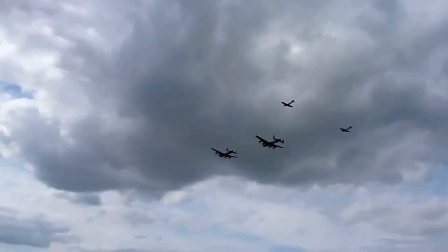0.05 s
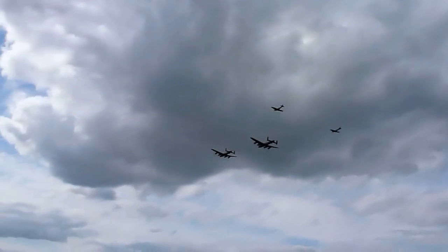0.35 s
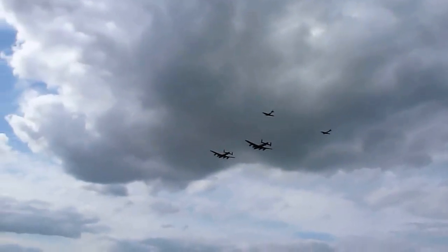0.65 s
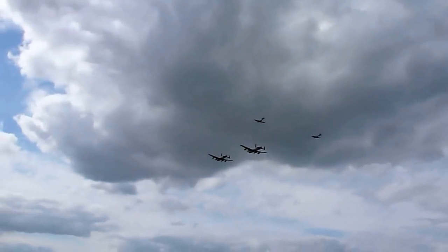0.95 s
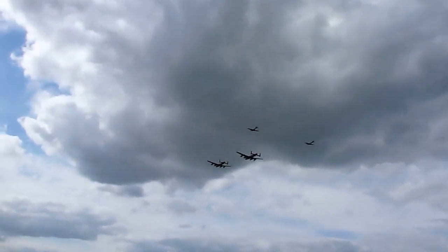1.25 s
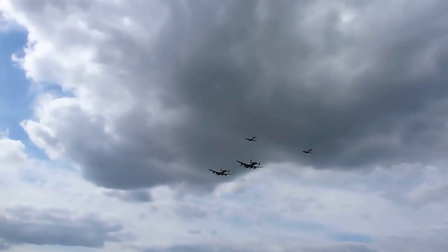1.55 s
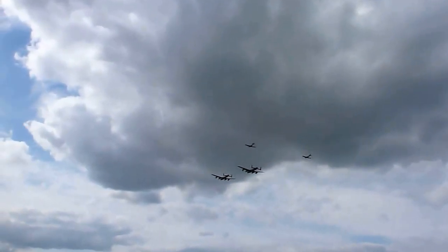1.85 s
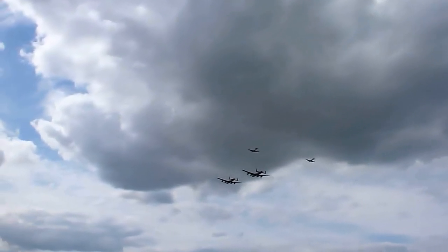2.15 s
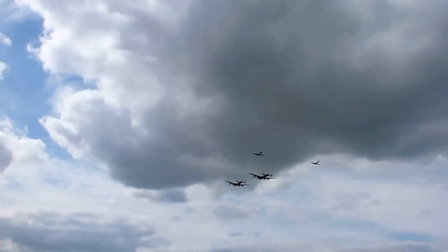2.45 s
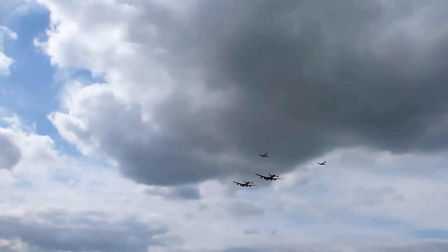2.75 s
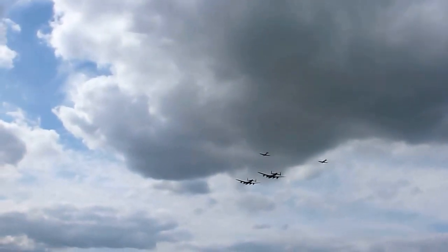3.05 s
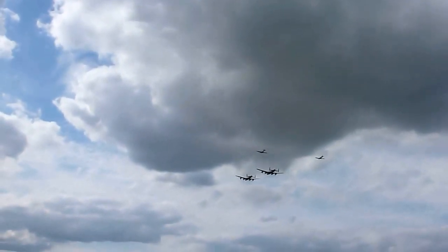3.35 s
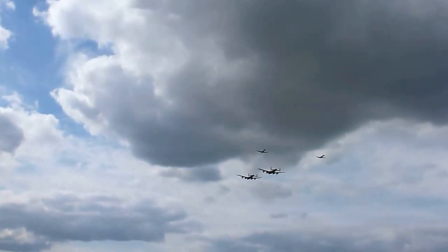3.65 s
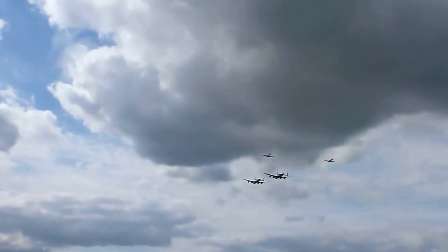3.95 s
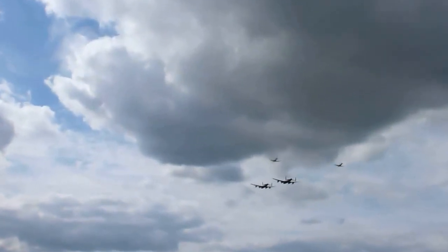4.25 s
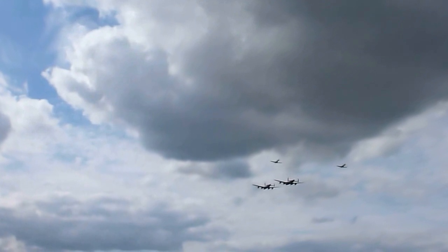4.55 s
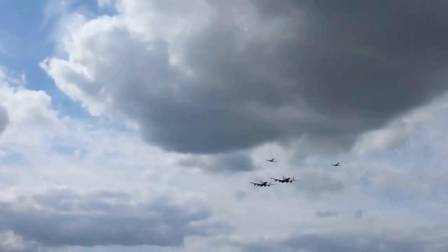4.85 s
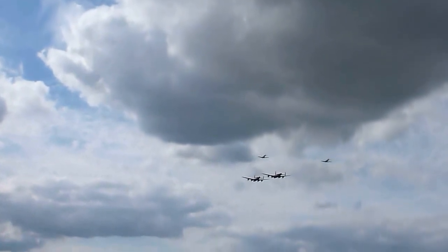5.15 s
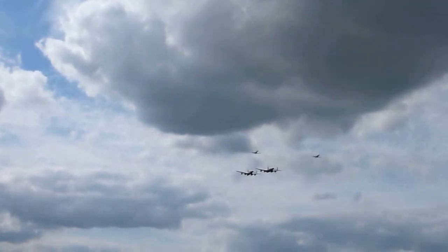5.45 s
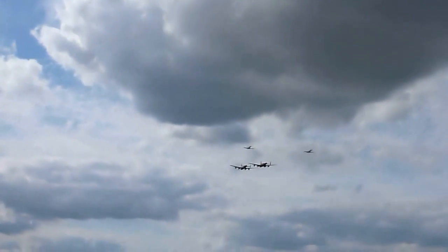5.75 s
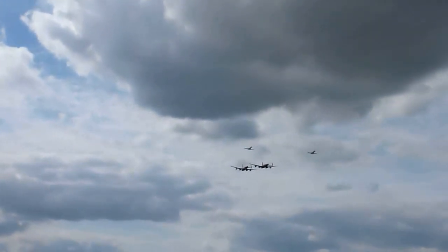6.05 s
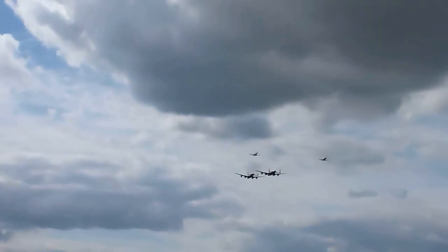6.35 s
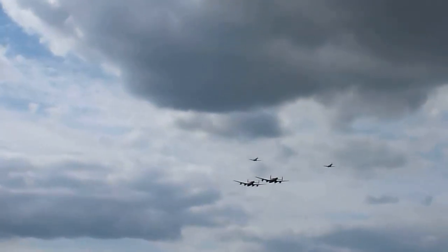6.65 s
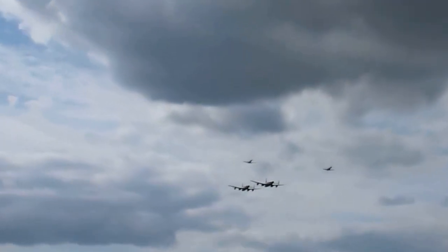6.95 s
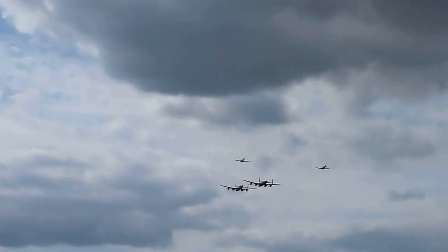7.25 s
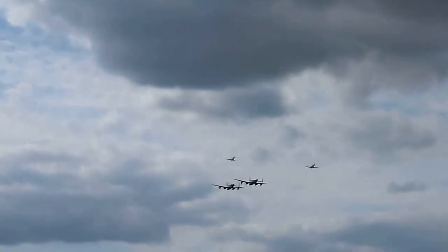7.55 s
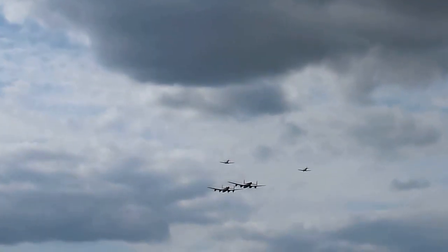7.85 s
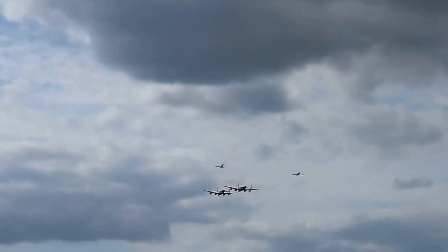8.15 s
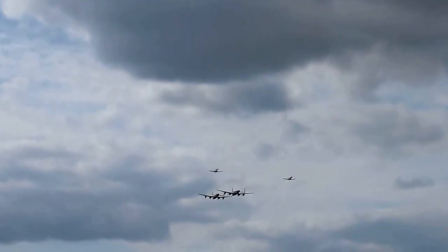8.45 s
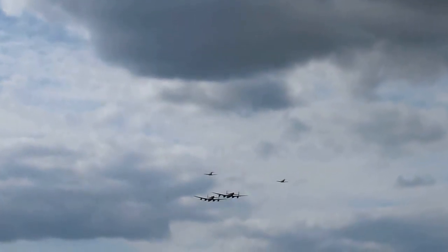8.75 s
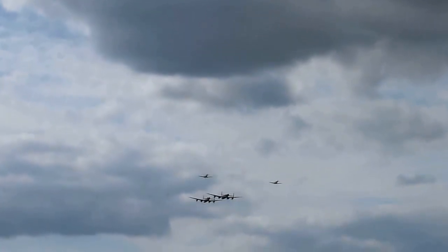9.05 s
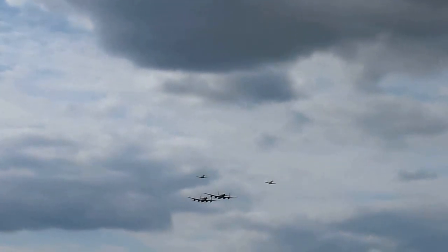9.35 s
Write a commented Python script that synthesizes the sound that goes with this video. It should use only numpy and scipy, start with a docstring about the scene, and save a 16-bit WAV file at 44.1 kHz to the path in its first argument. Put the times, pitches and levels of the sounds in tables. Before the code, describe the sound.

Piston-engined propeller planes fly away in formation with a throbbing, slowly fading drone, while wind gusts buffet the microphone.

```python
"""Open ground under cloud: two four-engined bombers and their single-engined escorts fly away.
Propeller tones beat over a growl of uneven firings, their pitch sinking with the Doppler shift.
The exhausts rattle and hiss in a roar that swells, fades and dulls with distance, combed by the
ground echo. Right at the stereo microphone, gusts buffet the ports, thump and now and then crackle."""
import sys
import numpy as np
from scipy import signal
from scipy.fft import rfft, irfft, next_fast_len
from scipy.io import wavfile
from scipy.ndimage import uniform_filter1d

SR = 44100
rng = np.random.default_rng(int(sys.argv[2]) if len(sys.argv) > 2 else 0)


def file_out(sig):
    """Save sig as 16-bit WAV at sys.argv[1]."""
    # one column per channel
    cols = np.atleast_2d(sig).T
    # limit, then scale
    lim = np.clip(cols, -1, 1)
    pcm = np.round(lim * 32767).astype(np.int16)
    wavfile.write(sys.argv[1], SR, pcm)


N = 418950
TIME = np.arange(N) / SR

# A low hum behind everything. Each row: time in seconds, level in dB.
HUM_LEVEL = [(0, -49), (2, -46), (3.4, -50), (9.5, -56)]
# Gusts at the microphone. Each row: start in seconds, length in seconds, strength in dB.
GUSTS = [(0.855, 0.014, -29), (1.14, 0.2, -44), (1.4, 0.52, -56), (2.132, 0.026, -41),
         (2.437, 0.086, -34.5), (2.757, 0.062, -47), (2.958, 0.07, -37.5), (3.086, 0.018, -32),
         (3.2, 0.067, -29.5), (3.322, 0.11, -25), (3.43, 0.06, -28), (3.703, 0.033, -46),
         (4.074, 0.13, -43), (4.267, 0.45, -38), (4.628, 0.19, -32.5), (5.032, 0.14, -36),
         (5.327, 0.052, -45), (5.524, 0.11, -49), (5.675, 0.062, -34), (5.824, 0.019, -24),
         (6.004, 0.13, -43), (6.643, 0.026, -35), (6.79, 0.018, -34.5), (6.874, 0.097, -29.5),
         (7.287, 0.091, -27), (7.417, 0.19, -28), (7.694, 0.12, -29), (7.916, 0.11, -31),
         (8.277, 0.04, -33), (8.457, 0.12, -33.5), (8.71, 0.065, -30.5), (8.96, 0.1, -30),
         (9.14, 0.45, -35.5)]
# Wind noise in the ports. Each row: frequency in Hz, relative level in dB.
WIND_SPECTRUM = [(15, -27.5), (28, -18), (50, -6), (90, 0.5), (200, -2), (420, -8.5), (600, -13),
                 (1000, -23), (1600, -32), (3500, -49.5), (7000, -87)]
# Single eddies slapping the ports. Each row: time in seconds, peak in dB, left minus right in dB.
THUMPS = [(3.091, -12, 3), (3.323, -14, 2), (3.367, -15, 5), (3.759, -14.5, 3), (5.765, -14, 0),
          (6.806, -12, 4), (7.334, -16, -6), (7.431, -20, 4), (7.465, -19, 5), (7.526, -18.5, 6),
          (7.559, -17, 4), (7.776, -14, 3), (7.786, -14, -2), (7.937, -12.5, 4), (7.950, -13.5, 6),
          (7.988, -16.5, 4), (8.809, -13.5, 2), (9.003, -18, 6), (9.052, -16, 6), (9.389, -16, 5)]
# Sharp crackles of wind. Each row: start in seconds, level in dB midway between the ports.
CRACKLES = [(.55, -39), (.614, -39), (.88, -40), (.947, -41), (1.239, -33), (2.441, -31), (3.081, -44),
            (5.313, -52), (5.836, -49), (6.956, -51), (7.305, -50), (7.468, -55), (7.530, -53),
            (8.970, -54), (9.195, -57), (9.391, -49)]
# Echoes off the ground, weakening and flipping sign at a grazing angle, and off a nearby surface.
# Each row: time in seconds, ground gain, near gain, near lag in milliseconds.
ECHOES = [(0, 0.38, 0.11, 2.02), (4.3, 0.29, 0.094, 2.15), (5.6, -0.059, 0.13, 2.1), (6.6, 0, 0.18, 2.09),
          (8.3, -0.15, 0.5, 2.08), (9.5, -0.014, 0.3, 1.83)]
# The band the ground echo lifts. Each row: time in seconds, centre in Hz, added gain.
GROUND_SWEEP = [(0, 369, 1.3), (.5, 389, 0), (1.2, 409, 0.49), (1.9, 450, 0.91), (2.7, 527, 1.4),
                (3.5, 631, 1.1), (4.2, 696, 1.4), (5.1, 674, 1.3), (5.8, 530, 0.34), (6.3, 519, 0.23),
                (6.8, 588, 0), (7.8, 558, 0.063), (9.3, 587, 0.84)]
# The receding engines. Each row: time in seconds, bombers' growl in dB, escort's drone in dB.
ENGINE_LEVELS = [(0, -32.5, -30), (2, -25.5, -31), (3.4, -32.5, -32), (4.2, -27, -39), (6, -34, -32),
                 (7.6, -39, -29.5), (9.5, -38, -35)]
# The escort's drone. Each row: multiple of the blade rate, relative level in dB.
ESCORT_HARMONICS = [(2, -7.5), (3, -18.5), (4, -8), (5, -5.5), (6, -15), (7, -18)]
# Colour of the bombers' growl. Each row: frequency in Hz, relative gain in dB.
GROWL_SPECTRUM = [(60, -36.5), (110, -13.5), (150, -4.5), (185, -1), (235, 1), (275, -1), (325, -10),
                  (420, -21.5)]
# Colour of the distant exhausts. Each row: frequency in Hz, relative gain in dB.
EXHAUST_SPECTRUM = [(90, -37.5), (200, -11), (330, 1.5), (440, -1), (600, -1.5), (790, -6), (1030, -5),
                    (1200, -11.5), (1370, -9), (1700, -15), (2200, -16), (2650, -15.5), (3250, -17.5),
                    (4650, -31), (7500, -53)]
# The roar swelling and fading as the moving air carries it.
# Each row: time in seconds, high rasp in relative dB, middle bark in relative dB.
ROAR_SWELLS = [(0.02,-41,-34), (0.28,-36,-34.5), (0.39,-40.5,-31), (0.57,-37,-33.5), (0.86,-38.5,-31.5),
               (1.12,-40.5,-33.5), (1.42,-38.5,-33), (2.2,-42,-35.5), (2.45,-40.5,-31.5),
               (2.51,-44.5,-37.5), (2.96,-41,-34), (3.24,-44.5,-36.5), (3.32,-48,-43), (3.62,-45.5,-40),
               (3.88,-44,-33.5), (4.09,-41,-35.5), (4.31,-44,-31), (4.44,-45,-38), (4.86,-47.5,-40.5),
               (5.04,-43.5,-33), (5.22,-45,-37), (5.6,-41.5,-31.5), (5.82,-40.5,-30), (5.85,-45,-32),
               (6.09,-46,-33.5), (6.56,-42.5,-33.5), (6.88,-45.5,-40.5), (7.0,-48,-37), (7.13,-43.5,-30),
               (7.26,-43,-32), (7.36,-48.5,-44), (7.58,-51,-47), (7.68,-46.5,-33.5), (7.86,-45.5,-37.5),
               (7.96,-50,-40.5), (8.3,-45,-33), (8.46,-46,-33.5), (8.62,-48,-36.5), (8.93,-44,-33.5),
               (9.01,-47.5,-35), (9.46,-47,-38)]
# The roar's low body, before gusts dip it. Each row: time in seconds, level in dB.
BODY_LEVEL = [(.08, -27), (.4, -32), (.68, -32), (.8, -30.5), (1.65, -29.5), (1.9, -29), (2.15, -32),
              (2.4, -28), (3.2, -32), (3.57, -34), (4.1, -29.5), (4.3, -31), (4.5, -34), (5.5, -32),
              (5.8, -27), (5.88, -30.5), (6.05, -29.5), (6.8, -32), (7.02, -37.5), (7.15, -30),
              (7.6, -33.5), (7.78, -27.5), (8.1, -31.5), (8.35, -32), (8.5, -29), (9.1, -28.5),
              (9.5, -31.5)]
# The bombers' tones between beats. Each row: blade harmonic, first level in dB, change in dB a second.
PROPELLER_TONES = [(2, -48, 1.34), (3, -46.5, 1.07), (4, -33, -3.5), (5, -30.5, -1.27), (6, -43.5, -0.47)]
# Beats, when the propellers fall into step on one harmonic.
# Each row: crest time in seconds, length in seconds, blade harmonic, crest level in dB.
BEATS = [(0.008, 0.21, 4, -17.5), (0.166, 0.35, 2, -35.5), (0.378, 0.72, 4, -18), (0.466, 0.26, 5, -25.5),
         (0.707, 1.07, 3, -30), (0.896, 0.6, 4, -19.5), (0.923, 0.43, 5, -24.5), (1.313, 0.23, 5, -24),
         (1.437, 0.62, 4, -25.5), (1.457, 0.82, 2, -40.5), (1.913, 0.77, 4, -22), (1.992, 0.44, 5, -20.5),
         (2.204, 0.65, 3, -32), (2.448, 0.49, 2, -33), (2.848, 0.75, 2, -38.5), (2.797, 1.3, 4, -28.5),
         (2.876, 0.48, 5, -21), (3.653, 0.55, 4, -31.5), (3.7, 0.54, 2, -33), (4.203, 0.46, 5, -26),
         (4.345, 0.83, 2, -32), (4.61, 0.38, 5, -25.5), (5.357, 0.82, 2, -28.5), (5.768, 0.27, 5, -26),
         (6.287, 1, 2, -24.5), (6.546, 0.5, 5, -33), (7.1, 0.73, 3, -46), (6.85, 0.44, 2, -28),
         (7.205, 0.41, 2, -30), (8.95, 0.63, 3, -35.5), (9.204, 0.38, 2, -32)]


def from_db(db):
    """Decibels to gain."""
    return 10 ** (np.asarray(db) / 20)


def rms_one(x):
    """Scale to unit rms."""
    return x / np.sqrt(np.mean(x ** 2) + 1e-20)


def evened(x):
    """Take out slow swells, keep the fine grain; rms 1."""
    power = np.mean(np.atleast_2d(x) ** 2, axis=0)
    return x / np.sqrt(uniform_filter1d(power, size=SR // 6) + 1e-9)


def in_time(rows):
    """The columns of a curve table, one value per sample."""
    seconds, *columns = np.transpose(rows)
    return [np.interp(TIME, seconds, column) for column in columns]


def settling(first, last, time_s):
    """Glide from one value toward another, ever more slowly."""
    return last + (first - last) * np.exp(-TIME / time_s)


def drift(rate):
    """Smooth chance that turns about `rate` times a second; spread 1."""
    hz = np.fft.rfftfreq(8192, 1 / 400)
    slow = irfft(rfft(rng.standard_normal(8192)) / (1 + (hz / rate) ** 2))
    return np.interp(TIME * 400, np.arange(len(slow)), rms_one(slow))


def colour(x, spectrum, low_hz=1, high_hz=SR):
    """Shape by a spectrum of (Hz, dB) points and keep one band of it; rms 1."""
    size = next_fast_len(N + 4096)
    hz = np.fft.rfftfreq(size, 1 / SR) + 1e-3
    points, db = np.transpose(spectrum)
    band = 1 / np.sqrt((1 + (low_hz / hz) ** 16) * (1 + (hz / high_hz) ** 16))
    gain = band * from_db(np.interp(np.log(hz), np.log(points), db))
    return rms_one(irfft(rfft(x, size) * gain, size)[..., :N])


def delayed(x, ms):
    """Read a signal `ms` milliseconds late."""
    return np.interp(TIME - ms / 1000, TIME, x)


def turns_of(hz, waver):
    """Cycles counted so far; turbulent air makes the rate waver."""
    return np.cumsum(hz * (1 + waver * drift(1.955))) / SR + rng.random()


def low_hum(hz):
    """One faint, slightly wavering tone in the background."""
    gain = from_db(in_time(HUM_LEVEL)[0])
    return gain * np.sqrt(2) * np.sin(2 * np.pi * turns_of(hz, waver=0.0024))


def gusts(attack_s=0.027, release_s=0.023):
    """Wind strength in dB: each gust rises, holds and dies away over a restless breeze."""
    strength = from_db(-62.5 + TIME - 5 * drift(4.5))  # the breeze freshens by 1 dB a second
    for start, length, db in GUSTS:
        outside = np.maximum((start - TIME) / attack_s, (TIME - start - length) / release_s)
        strength = np.maximum(strength, from_db(db) * np.exp(-np.clip(outside, 0, 20)))
    return 20 * np.log10(strength)


def wind(gust_db, lumpy_db):
    """Eddies buffet each port separately; strong gusts gain more in the flapping than in the rumble."""
    eddies = rng.standard_normal((2, N)) * from_db(lumpy_db * np.array([drift(92), drift(70)]))
    left_db = 0.27 * TIME  # the wind veers toward the left port
    rumble_db = 0.5 * gust_db - 11 - 0.2 * TIME  # and booms less as it turns
    rumble = from_db(rumble_db) * evened(colour(eddies, WIND_SPECTRUM, high_hz=243))
    flap = from_db(gust_db + 1.1) * evened(colour(eddies, WIND_SPECTRUM, low_hz=258))
    return (rumble + flap) * from_db([left_db, -left_db])


def thumps(band_hz):
    """An eddy bursts on the ports: one dull dip of pressure, usually stronger on the left."""
    kicks = np.zeros((2, N)) + 1e-18
    for start, db, pan_db in THUMPS:
        kicks[:, round(start * SR)] = -from_db([db + pan_db / 2, db - pan_db / 2])
    knock = signal.butter(2, band_hz, "band", fs=SR, output="sos")
    port = np.vstack([knock, signal.butter(2, 1400, fs=SR, output="sos")])
    height = np.abs(signal.sosfilt(port, signal.unit_impulse(512))).max()
    return signal.sosfilt(port, kicks) / height


def crackles(decay_s):
    """Short bursts of broad noise, mostly at the windward left port."""
    bursts = sum(from_db(db) * (TIME >= start) * np.exp(-np.abs(TIME - start) / decay_s)
                 for start, db in CRACKLES)
    noise = colour(rng.standard_normal(N), [(300, -6), (2500, 4), (7500, -23)])
    return bursts * noise * from_db([[2], [-2]])


def ground_lag_ms():
    """The ground echo closes up on the direct sound as the planes sink to the horizon."""
    return settling(5.55, 2.3, time_s=3.1)


def with_ground(tones, echo_gain=0.57):
    """Low tones meet their strong ground echo, which lifts some and cancels others."""
    return tones + echo_gain * delayed(tones, ground_lag_ms())


def reflections(x, left_lag_ms):
    """The ground combs the roar with climbing notches; a nearby surface turns it hollow near the end."""
    ground, near, near_ms = in_time(ECHOES)
    dull = signal.sosfiltfilt(signal.butter(1, 2500, fs=SR, output="sos"), x)
    echoes = [ground * delayed(side, ground_lag_ms()) + near * delayed(side, near_ms) for side in dull]
    left, right = x + np.array(echoes)
    return np.array([delayed(left, left_lag_ms), right])


def swept(x, width_hz):
    """Lift the band where direct sound and ground echo add up best; it climbs, then falls back a little."""
    centre_hz, lift = in_time(GROUND_SWEEP)
    carrier = np.exp(2j * np.pi * np.cumsum(centre_hz) / SR)
    pole = np.exp(-np.pi * width_hz / SR)
    band = 2 * np.real(carrier * signal.lfilter([1 - pole], [1, -pole], x / carrier))
    return x + lift * band


def escort_drone(blade_hz, fade_db):
    """The escort's higher propeller drone; each harmonic fades slowly by itself."""
    turns = turns_of(blade_hz, waver=0.00199)
    fades = [fade_db * drift(3) for _ in ESCORT_HARMONICS]
    return sum(from_db(db + fade) * np.sqrt(2) * np.sin(2 * np.pi * (k * turns + rng.random()))
               for (k, db), fade in zip(ESCORT_HARMONICS, fades))


def bomber_growl(blade_hz, fade_db):
    """Unequal firings sound between the blade harmonics; the engines slip, so the throb is uneven."""
    shaft = turns_of(blade_hz / 3, waver=0.001)  # three blades to a turn
    orders = 0
    for k in range(5, 23):
        if k % 3:
            gain = from_db(fade_db * drift(1.5))
            orders += gain * np.sin(2 * np.pi * (k * shaft + rng.random()) + 1.3 * drift(0.9))
    return evened(colour(with_ground(orders), GROWL_SPECTRUM))


def engine_rattle(turns, order_count):
    """A rattle repeating every turn: orders of chance strength and phase fade in and out on the way."""
    rattle = 0
    for real, imaginary in rng.standard_normal((3, 2, order_count)):
        cycle = irfft(np.r_[0, real + 1j * imaginary], 4096)
        rattle += drift(2.5) * np.interp(turns % 1 * len(cycle), np.arange(len(cycle)), cycle)
    return evened(rattle)


def throb(turns, sharpness):
    """One rounded pulse a cycle; rms 1."""
    return rms_one(np.exp(sharpness * np.cos(2 * np.pi * turns)))


def exhaust(bomber_hz, escort_hz, pop_db):
    """Engines slightly out of step rattle together; their hot jets hiss in pops and fill the treble."""
    rattle, jets = 0, 0
    for blade_hz in (bomber_hz * 0.996, bomber_hz * 1.004, escort_hz):
        blade = turns_of(blade_hz, waver=0.0015)
        rattle += engine_rattle(blade / 3, order_count=220) * from_db(2 * drift(2))
        blade_chop, firing_chop = throb(blade, sharpness=0.19), throb(2 * blade, sharpness=0.4)
        jets += rng.standard_normal(N) * blade_chop * firing_chop * from_db(pop_db * drift(160))
    hiss = colour(jets, [(400, -10), (1000, -8), (2200, -2), (3500, 0)])
    direct = rms_one(rattle) + from_db(11) * hiss
    # short waves scatter on the way and differ between the ports
    scatter_spectrum = [(450, 0.5), (700, -3.5), (1400, -6), (2000, 1), (3500, 0), (5000, -4)]
    scatter = from_db(-17.5) * direct.std() * colour(rng.standard_normal(N), scatter_spectrum)
    return direct + scatter * np.array([[1], [-1]])


def distant_roar(source, gust_dip, flutter_db):
    """The exhausts from afar: the treble bands swell together, and the higher fade faster."""
    def band(low_hz, high_hz):
        return colour(source, EXHAUST_SPECTRUM, low_hz, high_hz)

    carried_db, bark_db = in_time(ROAR_SWELLS)
    swell_db = carried_db - (-38.5 - TIME)  # swing about a steady fade of 1 dB a second
    rasp_db = -40.5 - TIME + 1.46 * swell_db
    edge_db = -44 - 2.08 * TIME + 0.75 * swell_db
    top_db = -50 - 4 * TIME + swell_db
    lows = colour(swept(source, width_hz=160), EXHAUST_SPECTRUM, high_hz=689)
    body = gust_dip * from_db(in_time(BODY_LEVEL)[0]) * evened(lows)
    bark = from_db(bark_db - 0.69 + flutter_db * drift(3.2)) * evened(band(716, 1545))
    rasp = from_db(rasp_db + flutter_db * drift(10)) * evened(band(1750, 2946))
    edge = from_db(edge_db + 1.4 * drift(23)) * evened(band(3470, 5010))
    top = from_db(top_db + 2.1 * drift(25)) * band(5120, 6700)
    return (body + bark) * from_db([[-0.55], [0.55]]) + (rasp + edge + top) * from_db([[-1.1], [1.1]])


def bomber_propellers(blade_hz, waver_db, flutter_db):
    """Passing blades sound a row of harmonics; each beat lifts one of them in a cosine arch."""
    turns, tones = np.cumsum(blade_hz) / SR, 0
    for k, first_db, db_per_s in PROPELLER_TONES:
        power = from_db(first_db + db_per_s * TIME + waver_db * drift(0.88)) ** 2
        for crest, length, harmonic, db in BEATS:
            if harmonic == k:
                arch = np.cos(np.pi * np.clip((TIME - crest) / length, -0.5, 0.5))
                power += (from_db(db) * arch) ** 2
        gain = np.sqrt(2 * power) * from_db(flutter_db * drift(35))
        tones += gain * np.sin(2 * np.pi * (k * turns + rng.random()) + drift(2.3) / 10)
    return tones


def scene():
    """The formation far ahead and a little to the right, wind right on the microphone."""
    # blade passing rates as heard, sinking with the Doppler shift
    bomber_hz, escort_hz = settling(52.9, 49.4, time_s=2.1), settling(59.4, 53.7, time_s=3.2)
    growl_db, escort_db = in_time(ENGINE_LEVELS)
    gust_db = gusts()
    # the engines' lower register dips while a gust nears or passes -27 dB
    gust_dip = (1 + from_db(gust_db + 27) ** 2) ** -0.76
    propellers = bomber_propellers(bomber_hz, waver_db=2.0, flutter_db=0.3)
    growl = from_db(growl_db) * bomber_growl(bomber_hz, fade_db=3.5)
    escort = from_db(escort_db) * with_ground(escort_drone(escort_hz, fade_db=2.5))
    drone = (propellers + growl + escort) * gust_dip * from_db([[-0.3], [0.3]])
    hum = low_hum(hz=43)
    exhausts = reflections(exhaust(bomber_hz, escort_hz, pop_db=2.7), left_lag_ms=0.009)
    roar = distant_roar(exhausts, gust_dip, flutter_db=0.95)
    buffets = wind(gust_db, lumpy_db=2.5) + thumps(band_hz=[110, 410]) + crackles(decay_s=0.01)
    microphone_hiss = from_db(-77.5) * rng.standard_normal(N)
    return microphone_hiss + hum + buffets + roar + drone


def record(dry):
    """The sound eases in over 4 ms; the recorder cuts steeply above 7500 Hz."""
    onset = np.minimum(TIME / 0.004, 1)
    return signal.sosfilt(signal.ellip(10, 0.2, 90, 7500, fs=SR, output="sos"), dry * onset)


dry = scene()
out = record(dry)
file_out(out)
```